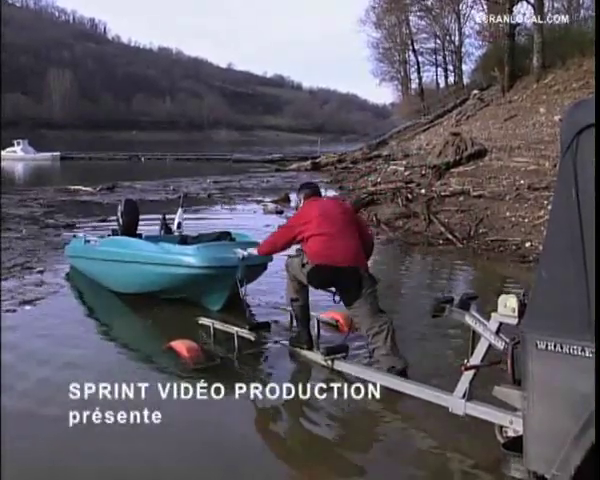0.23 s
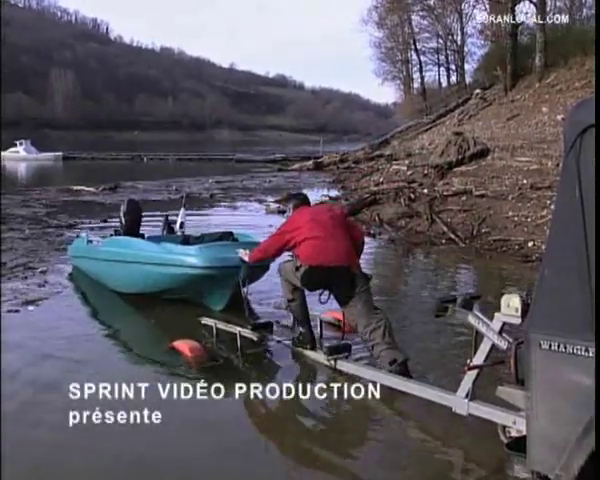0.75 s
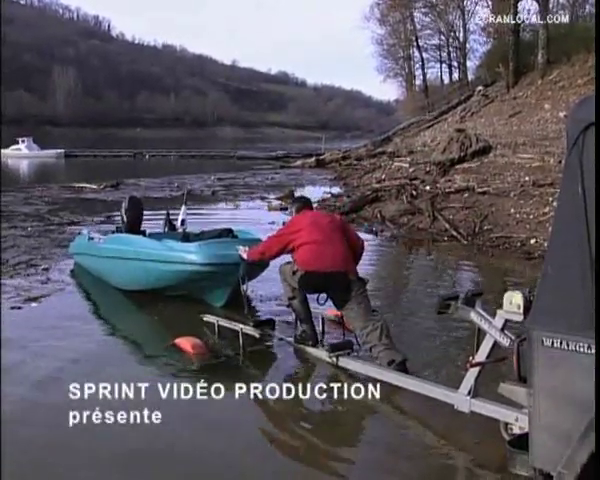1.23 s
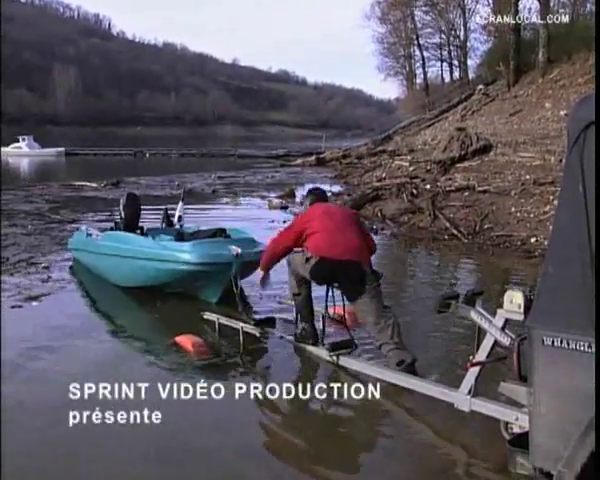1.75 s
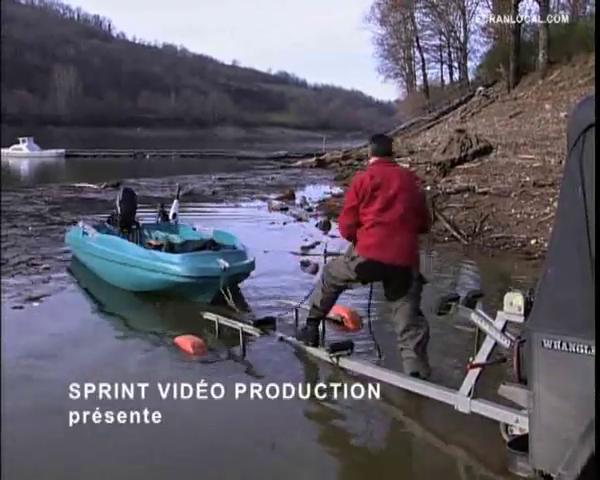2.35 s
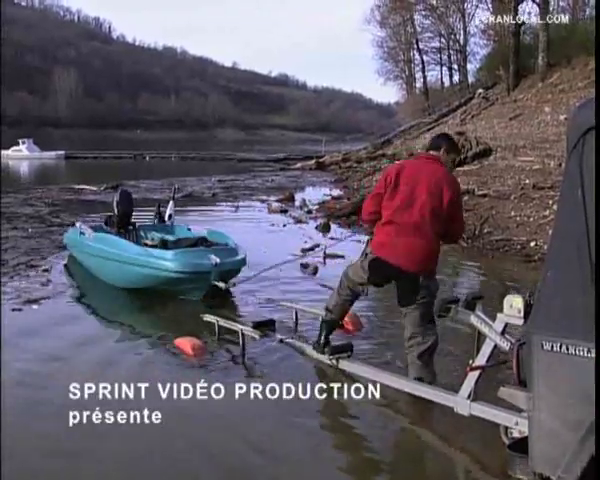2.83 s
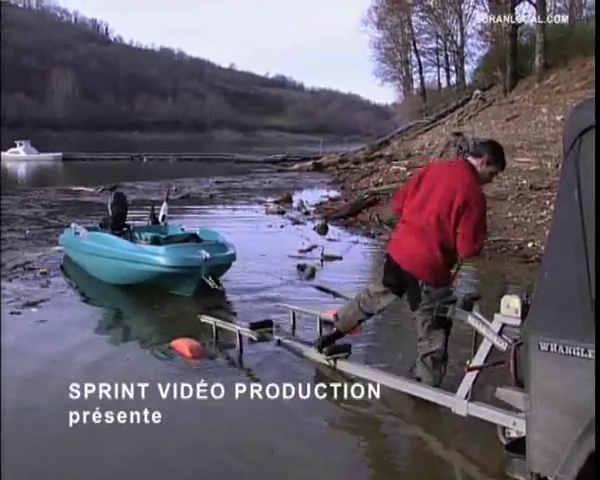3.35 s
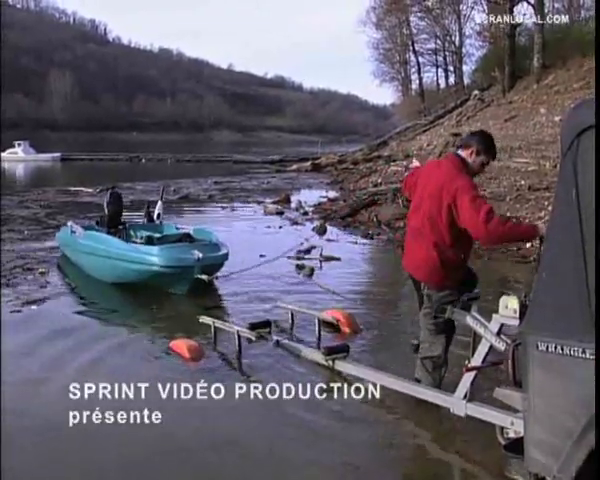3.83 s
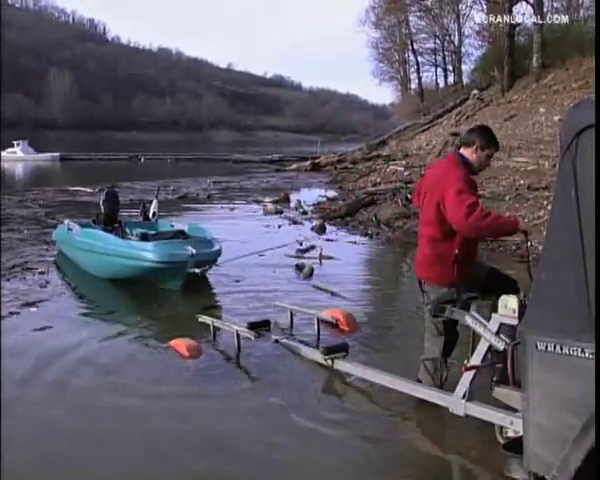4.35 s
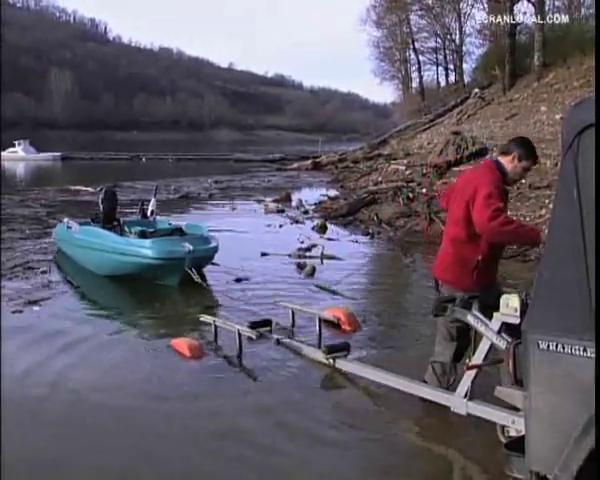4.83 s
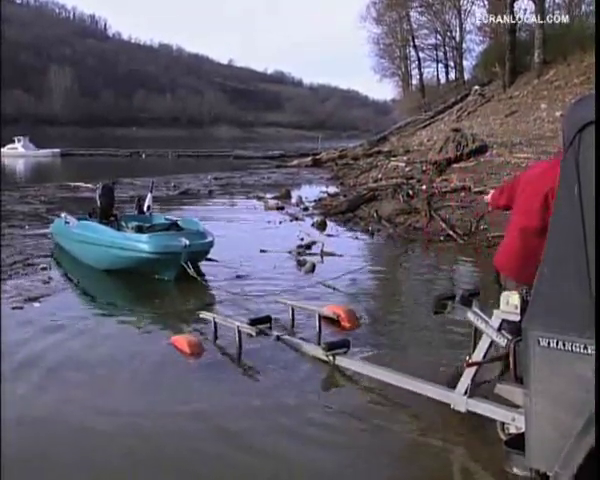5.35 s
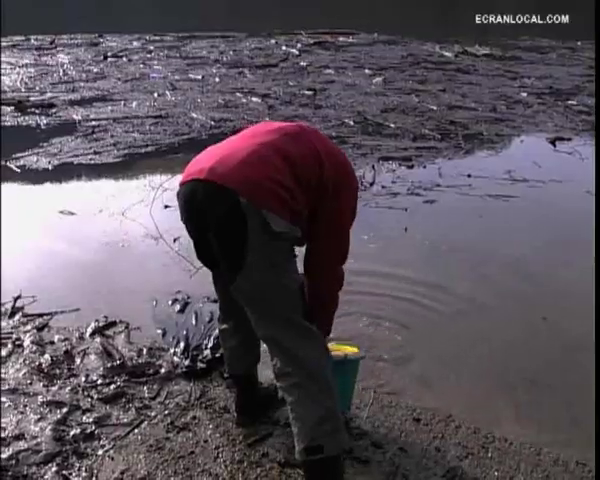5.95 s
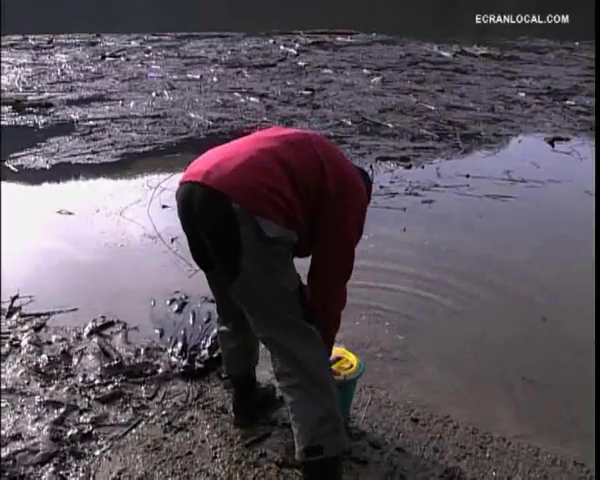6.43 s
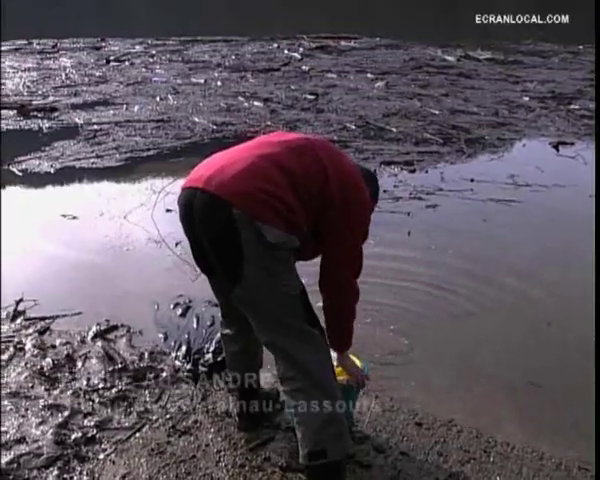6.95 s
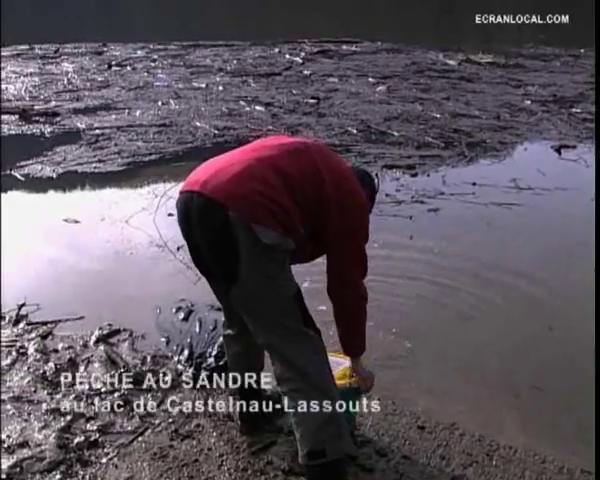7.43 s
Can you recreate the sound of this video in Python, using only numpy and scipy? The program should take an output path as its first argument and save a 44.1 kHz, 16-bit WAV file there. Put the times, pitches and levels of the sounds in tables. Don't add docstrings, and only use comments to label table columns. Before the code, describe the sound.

A petrol engine idles unevenly by a lake with small water splashes, then fades away to a plastic bucket scraping gravel and its lid snapping.

```python
import sys
import numpy as np
from scipy import signal
from scipy.fft import rfft, irfft
from scipy.io import wavfile
from scipy.ndimage import uniform_filter1d

SR = 44100
rng = np.random.default_rng(int(sys.argv[2]) if len(sys.argv) > 2 else 0)


def pcm_store(signal):
    levels = np.round(np.clip(np.atleast_2d(signal), -1, 1) * 32767)
    wavfile.write(sys.argv[1], SR, levels.astype(np.int16).T)


def decibels_to_gain(level_db):
    exponent = np.asarray(level_db, float) / 20
    return 10 ** exponent


N = 339563
TIME_S = np.arange(N) / SR

# pitch_hz, level_db (per Hz)
SHORE_COLOUR = [(53, -36), (90, 4.5), (226, -8), (369, -5.5), (410, -9), (497, -10), (3120, -22.5),
                (8710, -28), (11200, -33), (14800, -31)]
# peak_s, length_s, level_db
GUSTS = [(5.95, 0.27, -43), (6.32, .09, -47), (6.6, .25, -53.5), (6.84, 0.065, -55), (6.96, 0.067, -44.5),
         (7.17, 0.27, -52), (7.51, .08, -59)]
# start_s, peak_db, pitch_hz, glide_per_s, decay_cycles
BUBBLES = [(1.546, -28.5, 2230, 5, 2.2), (5.481, -23.5, 725, 3, 3), (5.482, -25.5, 1090, 4, 3.2),
           (5.517, -16, 427, 4.3, 0.56), (5.549, -39, 1230, 9.3, 6), (5.607, -38, 1100, 10, 8.3),
           (5.651, -35, 1100, 17, 2.3), (5.733, -27.5, 1270, 14, 5.1), (5.77, -42, 2900, 9.3, 10),
           (5.789, -51, 1050, 10, 6), (5.89, -42, 2550, 11.3, 6), (5.941, -45, 1330, 24, 4.9),
           (5.973, -43, 3010, 5, 13), (6.01, -56, 2530, 13, 9.7), (6.043, -50, 2330, 9.1, 10),
           (6.05, -45, 3300, 2, 8), (6.087, -45, 4600, 5, 10), (6.115, -53, 2370, 5.9, 8.4),
           (6.39, -32.5, 2750, 3, 1.8), (7.163, -47.5, 2270, 15, 6.9), (7.182, -60, 2550, 5, 10),
           (7.228, -60, 2490, 5, 16), (7.265, -62, 2500, 5, 20), (7.275, -57, 3480, 3, 30)]
# start_s, peak_db, pitch_hz
SMACKS = [(4.557, -30, 3300), (4.581, -31, 4800), (4.61, -33, 5200), (6.04, -46, 2600), (6.62, -51, 3500)]
# peak_s, length_s, coarse_db, fine_db
SPLASHES = [(1.55, .02, -70, -52), (4.587, 0.087, -58, -48.5), (5.6, 0.46, -48, -53),
            (5.796, 0.19, -61, -55), (5.952, 0.055, -50.5, -49), (6.046, 0.063, -75, -55)]
# time_s, pitch_hz
HOLLOW_PITCH = [(6.2, 250), (6.39, 253), (6.53, 201), (6.58, 224), (6.9, 210), (7.1, 190), (7.4, 214),
                (7.56, 200), (7.64, 209)]
# pitch_ratio (to the hollow pitch), level_db, fade_s (to -60 dB)
HOLLOW_TONES = [(1.04, 9.5, 0.04), (2.6, -21, 0.056)]
# pitch_hz, level_db, fade_s (to -60 dB)
LID_TONES = [(621, -8.5, 0.1), (980, 2, 0.039), (1186, -7, 0.087), (1660, -8, 0.041), (2090, -18, 0.099),
             (2520, -7, 0.043), (2790, -6, 0.019), (3340, -20, 0.094), (3850, -19, 0.033),
             (4050, -17, 0.082), (4430, -26, .04)]
# peak_s, length_s, hollow_db, wall_db, grit_db
SCRAPES = [(6.218, 0.03, -49, -61, -80), (6.272, 0.036, -55, -55.5, -85), (6.337, 0.043, -50, -72, -82),
           (6.412, 0.052, -40, -53.5, -60), (6.481, 0.046, -34.5, -40, -55),
           (6.519, 0.029, -26, -45.5, -61), (6.576, .05, -39.5, -55, -64), (6.954, 0.039, -36.5, -52, -70),
           (7.104, 0.043, -59, -66, -60), (7.163, .025, -62, -65, -45), (7.258, .1, -65, -60, -51),
           (7.564, 0.031, -33.5, -42, -48), (7.669, 0.066, -38, -45, -57)]
# start_s, peak_db, treble_db, hollow_db
BUMPS = [(6.201, -64, -56, -50), (6.267, -60, -68, -46), (6.325, -57, -67, -47), (6.389, -46, -62, -37.5),
         (6.418, -58, -65, -45), (6.449, -45, -57, -34), (6.46, -45, -48, -41), (6.481, -33, -38, -30),
         (6.509, -45, -60, -27), (6.562, -46, -67, -37), (6.926, -42, -66, -38.5),
         (6.95, -34.5, -63, -31.5)]
# start_s, peak_db, treble_db, treble_hz, ring_share (a gripped lid rings shorter)
SNAPS = [(7.4, -29.5, -22, 1910, 1.55), (7.474, -38, -54, 1580, 0.64), (7.49, -29.5, -25.5, 2650, 0.57),
         (7.527, -35.5, -35, 3740, .6), (7.545, -37, -46, 1659, .8), (7.551, -33, -28, 2310, 0.63),
         (7.574, -35, -43, 2520, 0.77), (7.595, -37, -40, 3320, 1.2), (7.618, -46, -56, 1798, .6),
         (7.634, -47, -47, 1840, .6), (7.641, -23.5, -13, 1480, .7), (7.671, -27, -29, 800, .5)]
# time_s, firings_per_s
IDLE_SPEED = [(0, 29.54), (.7, 29.91), (.95, 29.52), (1.75, 29.2), (2.15, 30.19), (2.9, 29.85),
              (3.25, 30.88), (3.85, 29.79), (4.15, 30.56), (4.9, 30.25), (5.8, 30.64)]
# header_late_ms, thump_db, header_db, header_pitch_ratio
CYLINDERS = [(-2.5, 2.5, -13, 1.034), (-2.5, 1.5, -0.07, 1.001), (-3, 2.2, -5.5, 1.002),
             (-2, 1.9, 0.1, 1.001)]
# time_s, strength_db
WEAK_FIRINGS = [(.14, -9), (.41, -5.5), (.845, 1), (1.08, -2), (1.354, -6.5), (1.558, -23), (2.035, -3),
                (2.2, -6.5), (2.3, -11), (2.835, -4), (3.62, -7), (3.89, -4), (4.153, -16), (4.416, -6),
                (4.945, -2), (5.208, -5)]
# pitch_hz, level_db, fade_s (to -60 dB)
TAILPIPE = [(59.3, 11, .039), (79.2, 4.5, .068), (131.6, -8, .13)]
# pitch_hz, level_db, fade_s (to -60 dB)
HEADER = [(207.1, -3, 0.16), (219.43, -0.86, 0.17), (225.25, -1, 0.14), (355.8, -10.5, 0.049)]
# pitch_hz, level_db, fade_s (to -60 dB)
SILENCER = [(238.5, -14.5, 0.091), (333.3, -23.5, 0.17), (466.5, -29, 0.13), (669, -39, 0.16),
            (764, -35.5, 0.15)]
# pitch_hz, level_db (per Hz)
MACHINERY = [(290, -14.5), (500, -2), (560, -14.5), (776, -3.5), (974, -12.5), (1600, -10), (2100, -21),
             (3210, -18.5), (3750, -11.5), (5990, -13.5), (6610, -11.5), (12000, -27), (14800, -69)]
# pitch_hz, width_hz, level_db
COVERS = [(1170, 93, -2), (3690, 350, -1), (6585, 54, -3)]


def level(x, db):
    return x * decibels_to_gain(db) / np.sqrt(np.mean(x ** 2))


def noise():
    return rng.standard_normal(N)


def curve(table):
    return np.interp(TIME_S, *np.transpose(table))


def coloured(x, points):
    hz, db = np.transpose(points)
    f = np.maximum(np.arange(N // 2 + 1) * SR / N, 1)
    return irfft(rfft(x) * decibels_to_gain(np.interp(np.log(f), np.log(hz), db)), N)


def band(x, hz, width_hz):
    return level(signal.lfilter(*signal.iirpeak(hz, hz / width_hz, SR), x), 0)


def walk(rate_hz):
    hold = int(SR / rate_hz)
    steps = np.repeat(rng.standard_normal(N // hold + 1), hold)
    return 1.364 * uniform_filter1d(uniform_filter1d(steps, hold), hold)[:N]


def add(out, start_s, sound):
    i = int(start_s * SR)
    out[max(i, 0):max(i + len(sound), 0)] += sound[max(-i, 0):max(N - i, 0)]


def ring(tones, rise_s, pitch=1, turn=0):
    t = np.arange(SR // 5) / SR
    out = np.zeros(len(t))
    for k, (hz, db, fade_s) in enumerate(tones):
        out += decibels_to_gain(db - 60 * t / fade_s) * np.sin(2 * np.pi * (hz * pitch * t + turn * k))
    return (1 - np.exp(-t / rise_s)) * out


def swell(rows, rise, bend=1):
    t = np.arange(0, N + 16, 16) / SR
    humps = np.zeros(len(t))
    for peak_s, length_s, db in rows:
        side_s = np.where(t < peak_s, rise * length_s, length_s)
        humps += decibels_to_gain(db - 20 * abs((t - peak_s) / side_s) ** bend)
    return np.interp(TIME_S, t, humps)


def shore():
    rumble = band(band(noise(), 35, 11.5), 32.5, 30)
    calm_db = -63.5
    wind = decibels_to_gain(calm_db) + swell(GUSTS, 0.72, bend=1.9)
    return level(coloured(noise(), SHORE_COLOUR), -61) + rumble * wind


def bubbles():
    out, t = np.zeros(N), np.arange(SR // 20) / SR
    smacks = [(*drop, 0, 1.4) for drop in SMACKS]
    for start_s, db, hz, glide, cycles in BUBBLES + smacks:
        fall = np.exp(-t * hz / cycles)
        rising = 1 + glide * np.minimum(t, .02)
        add(out, start_s, decibels_to_gain(db) * fall * np.sin(2 * np.pi * hz * t * rising))
    return out


def spray():
    out, t = np.zeros(N), np.arange(400) / SR
    for low_hz, column in ((500, 2), (1900, 3)):
        crowd = np.zeros(N)
        for place, pitch, size in rng.random((5000, 3)):
            hz = low_hz * 4 ** pitch
            loud = (1.06 - size) ** -.6
            add(crowd, 1.5 + 4.7 * place, loud * np.exp(-t * hz / 7.0) * np.sin(2 * np.pi * hz * t))
        splashes = swell(np.array(SPLASHES)[:, [0, 1, column]], 0.76, bend=1.33)
        out += level(crowd, -3.0) * splashes
    return out


def scrapes(hollow_hz):
    hollow, walls, grains = (swell(np.array(SCRAPES)[:, [0, 1, k]], 0.7, 1.57) for k in (2, 3, 4))
    rattle = swell([(s, .04, treble_db - 23) for s, _, treble_db, _, _ in SNAPS], 0.1)
    wobbly_hz = hollow_hz * (1 + .035 * walk(70))
    body = np.sin(2 * np.pi * np.cumsum(wobbly_hz) / SR) * decibels_to_gain(2.2 * walk(60))
    rub = noise() * decibels_to_gain(2.8 * rng.exponential(size=N))
    wall = level(band(rub, 686, 129) + 0.2 * band(rub, 710, 330), 0)
    grit = band(band(rub, 2200, 3000), 2500, 4700)
    return (body * hollow * decibels_to_gain(1.7)
            + wall * (walls + rattle) * decibels_to_gain(0.5)
            + grit * (grains + rattle) * decibels_to_gain(-17.0))


def knocks(hollow_hz):
    out, t = np.zeros(N), np.arange(SR // 10) / SR
    blows = [(*bump, 2000, 0.62) for bump in BUMPS]
    for start_s, db, treble_db, treble_hz, share in SNAPS:
        blows.append((start_s, db, treble_db, db - 23, treble_hz, share))
    fall = np.exp(-t / 0.0039) + 0.11 * np.exp(-t / 0.032)
    for start_s, db, treble_db, hollow_db, treble_hz, share in blows:
        luck = rng.standard_normal(len(t))
        struck = [(hz, d + 3 * luck[k], fade_s * share) for k, (hz, d, fade_s) in enumerate(LID_TONES)]
        add(out, start_s, decibels_to_gain(db - 4.5) * ring(struck, 0.00034, 1 + 0.016 * luck[-1], turn=0.378))
        bright = band(band(luck, treble_hz, 1500), 2400, 5900)
        broad = band(band(luck, 2400, 3500), 2500, 5600)
        crack = level(bright + 0.23 * broad, 0)
        thud = band(luck, 1170, 900)
        add(out, start_s, fall * (decibels_to_gain(treble_db - 6.5) * crack + decibels_to_gain(db - 12.0) * thud))
        boom = ring(HOLLOW_TONES, 0.00046, hollow_hz[int(start_s * SR)])
        add(out, start_s, decibels_to_gain(hollow_db - 2.0) * boom)
    return out


def bucket():
    hollow_hz = curve(HOLLOW_PITCH)
    soft = signal.butter(1, 7000, fs=SR, output="sos")
    return signal.sosfilt(soft, scrapes(hollow_hz) + knocks(hollow_hz))


def firings():
    count = .21 + np.cumsum(curve(IDLE_SPEED)) / SR
    order = np.arange(-3, 186)
    times = np.interp(order + .38, count, TIME_S) + np.minimum(order, 0) / 30
    force_db = np.zeros(len(times))
    for weak_s, db in WEAK_FIRINGS:
        force_db[np.argmin(abs(times - weak_s))] = db
    return order, times, force_db


def pipes():
    thump, puff = np.zeros(N), np.zeros(N)
    puff_shape = np.exp(-np.arange(SR // 20) / SR / 0.0075)
    for k, fire_s, db in zip(*firings()):
        luck = rng.standard_normal(4)
        late_ms, thump_db, header_db, pitch = CYLINDERS[k % 4]
        tailpipe = ring(TAILPIPE, .02, turn=.305)
        add(thump, fire_s + .0018, decibels_to_gain(db + thump_db + .8 * luck[0]) * tailpipe)
        header = ring(HEADER, .02, pitch * (1 + .006 * luck[1]), turn=.162)
        header_s = fire_s + (late_ms + 0.32 * luck[2]) / 1000
        add(thump, header_s, decibels_to_gain(db + header_db + luck[3]) * header)
        silencer = ring(SILENCER, 0.015, turn=0.28)
        add(thump, fire_s - .0022 + .0001 * luck[2], decibels_to_gain(db + 2.0 * luck[1]) * silencer)
        add(puff, fire_s, decibels_to_gain(db + 2.0 * luck[3]) * puff_shape)
    thump = signal.sosfilt(signal.butter(2, 45, "high", fs=SR, output="sos"), thump)
    thump = .25 * thump + .75 * signal.filtfilt(*signal.iirnotch(30, 1.6, SR), thump)
    return thump, puff


def machinery(puff):
    ticks = noise() * decibels_to_gain(1.25 * rng.exponential(size=N))
    hiss = level(coloured(ticks * (1 + 0.5 * puff), MACHINERY), 0)
    for hz, width_hz, db in COVERS:
        hiss += decibels_to_gain(db - 10.0 + 2.96 * walk(25.02)) * band(noise(), hz, width_hz)
    return decibels_to_gain(-50 + 0.81 * walk(9)) * hiss


def engine():
    thump, puff = pipes()
    gas = band(noise(), 130, 113) * decibels_to_gain(-15)
    gas += band((2.2 + puff) * noise(), 940, 1000) * decibels_to_gain(-28)
    exhaust_db = np.full(N, -29.0)
    for weak_s, db in WEAK_FIRINGS:
        exhaust_db += 0.27 * db * np.exp(-((TIME_S - weak_s - 0.02) / 0.015) ** 2)
    fade_from_s, fade_to_s = 5.395, 6.203
    exhaust_db -= 7 * np.maximum(TIME_S - fade_from_s, 0)
    exhaust_db -= 7.5 * np.clip((TIME_S - 5.89) / 0.0072, 0, 1)
    progress = np.clip((TIME_S - fade_from_s) / (fade_to_s - fade_from_s), 0, 1)
    fade = np.cos(np.pi / 2 * progress ** 1.3)
    return fade * (decibels_to_gain(exhaust_db) * (level(thump, 0.9) + gas) + machinery(puff))


def scene():
    return (shore() + bubbles() + spray() + bucket() + engine())[None]


def low_pass(x):
    return signal.sosfilt(signal.butter(12, 15000, fs=SR, output="sos"), x)


def record(dry):
    rounded = np.tanh(2 * dry) / 2
    top = signal.ellip(8, .2, 70, 14500, fs=SR, output="sos")
    mix = signal.sosfilt(top, rounded)
    return low_pass(mix)


dry = scene()
out = record(dry)
pcm_store(out)
```